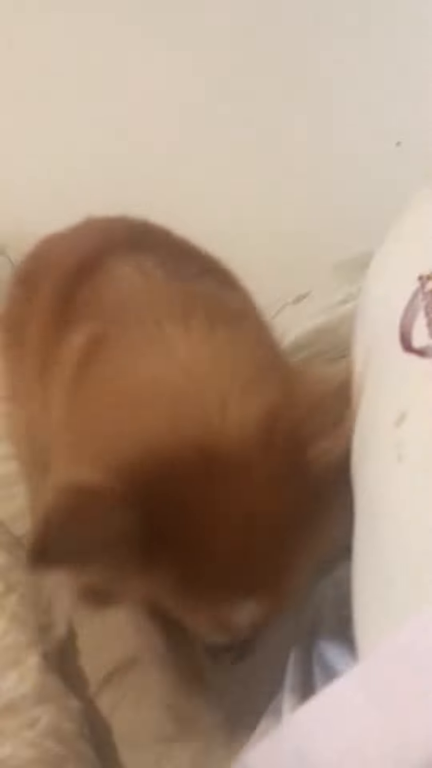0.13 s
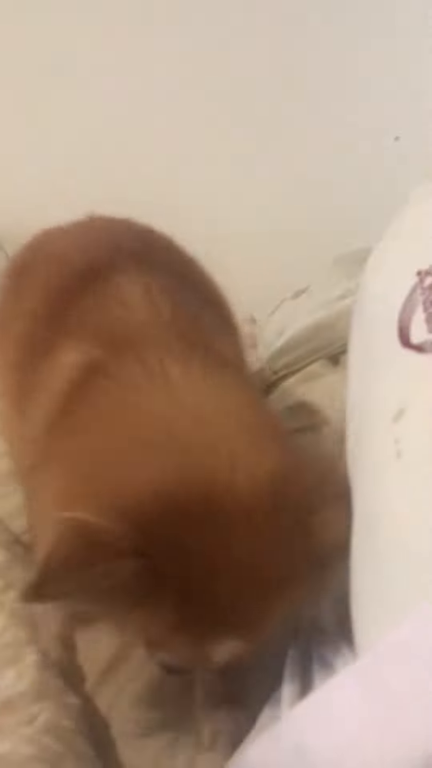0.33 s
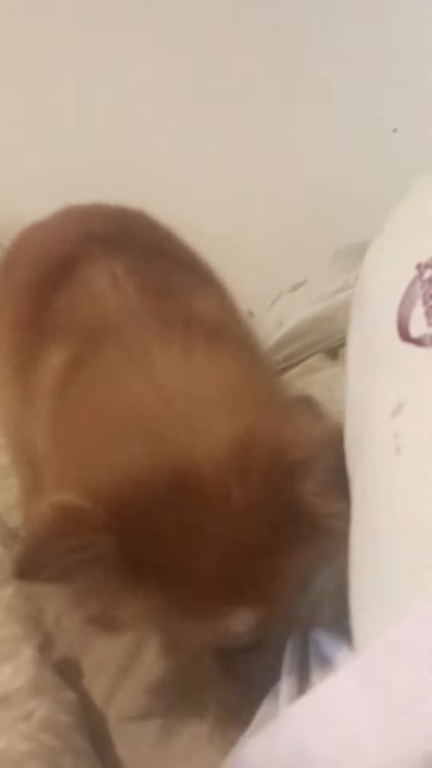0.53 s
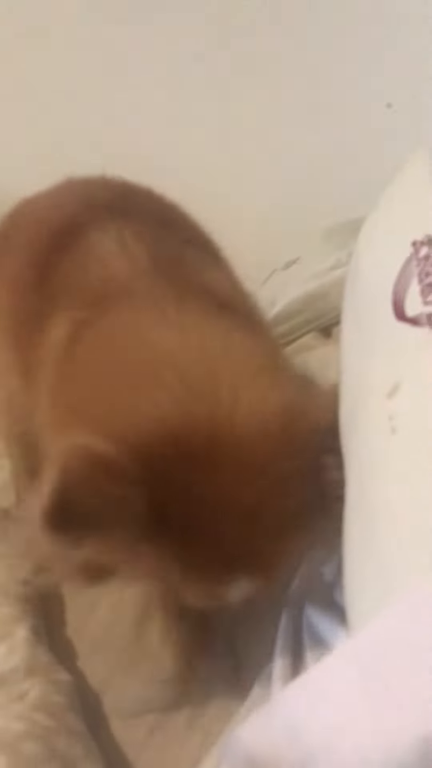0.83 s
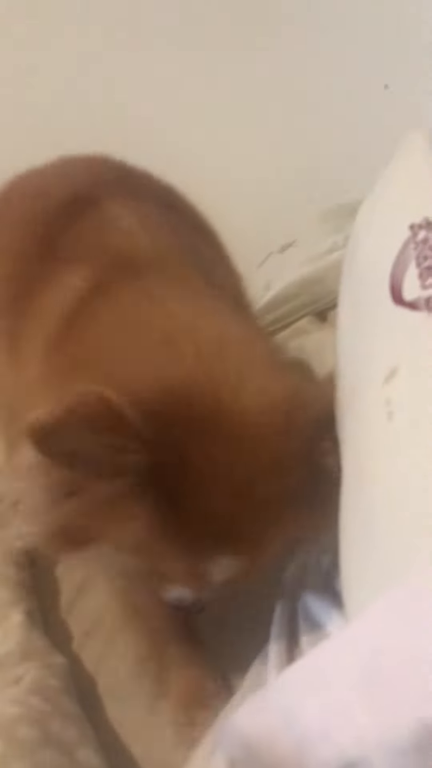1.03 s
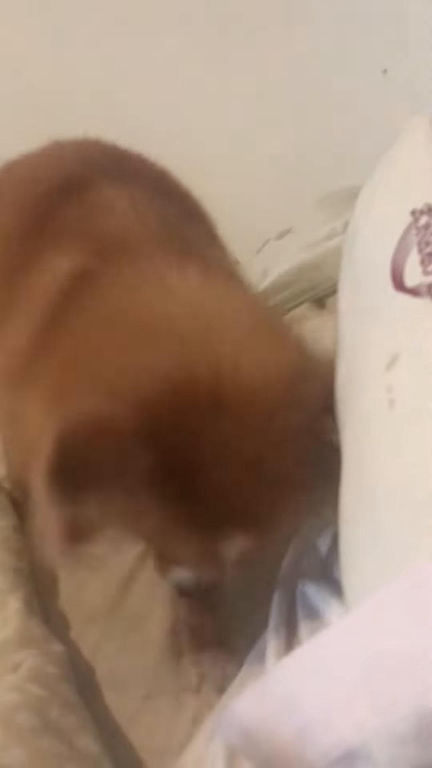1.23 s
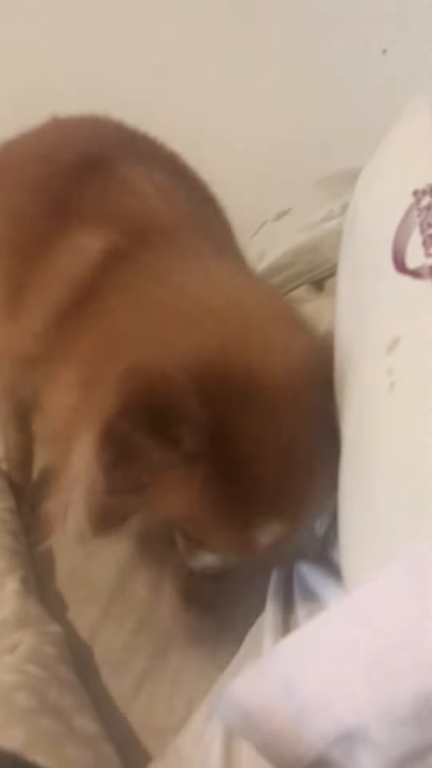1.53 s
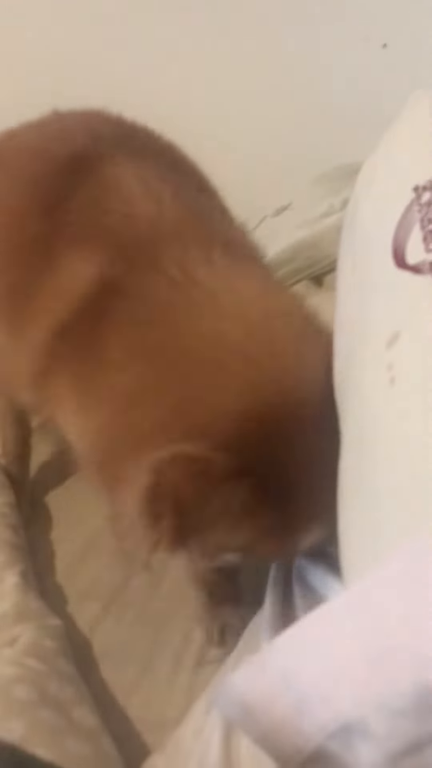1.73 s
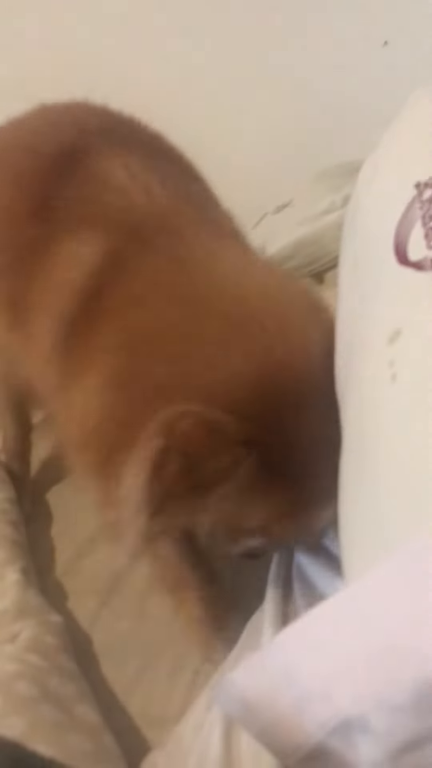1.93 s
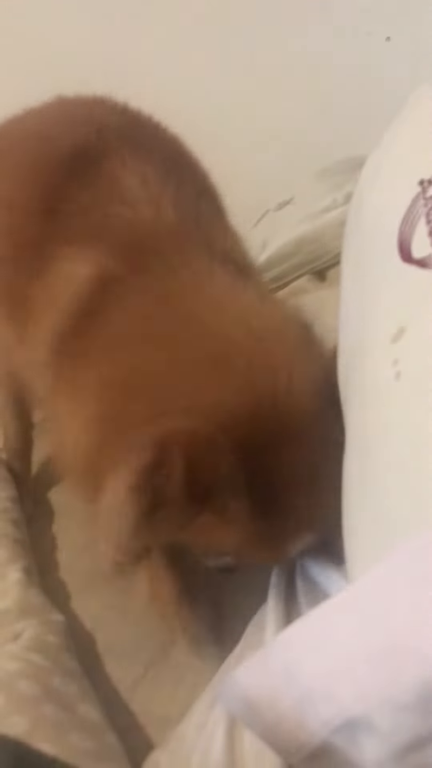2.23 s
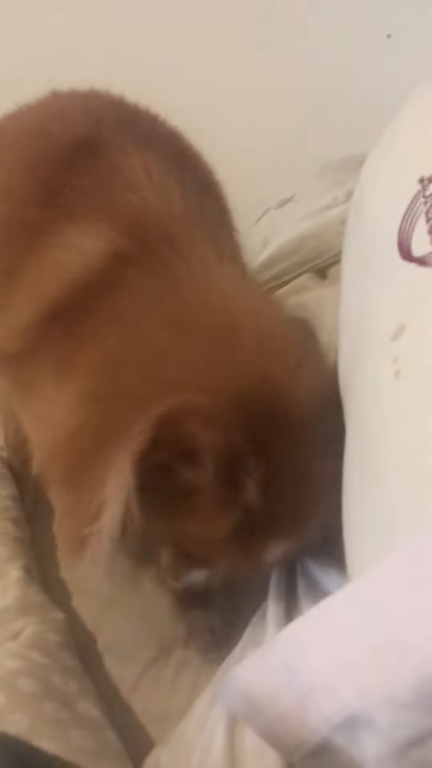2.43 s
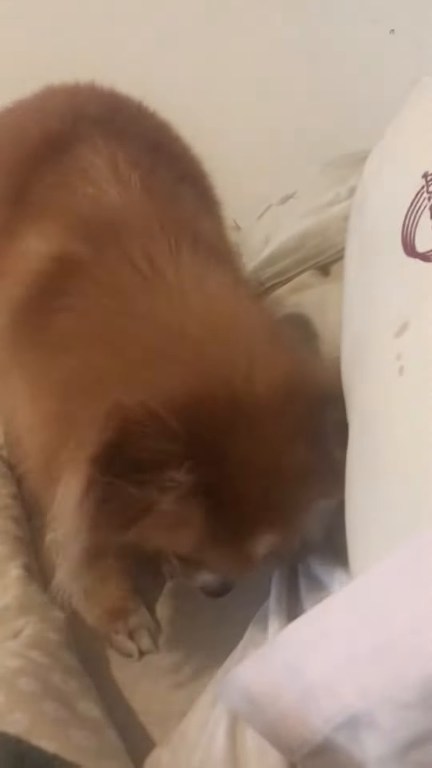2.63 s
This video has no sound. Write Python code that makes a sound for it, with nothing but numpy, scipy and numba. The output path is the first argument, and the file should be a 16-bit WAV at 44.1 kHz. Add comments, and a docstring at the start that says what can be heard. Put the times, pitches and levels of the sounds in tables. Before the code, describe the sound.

A small dog scratches bedding in quick, regular strokes, claws zipping over the weave, paws thudding dully on the mattress, with short snorts between strokes; close phone microphone in a quiet, slightly live bedroom.

```python
"""Quiet bedroom: a small dog digs at the bedding with quick strokes of both front paws, close to a phone.
Pads rub the sheet as moving noise bands; claws zip over the weave as glides whose pitch mostly climbs.
Cloth snaps free in fast upward chirps. The mattress thuds (decaying sines) and rumbles (resonant noise).
The dog snorts between strokes: noise in nose resonances. Short room tail, faint room noise.
"""
import sys
import numpy as np
from scipy import signal
from scipy.fft import rfft, irfft
from scipy.io import wavfile
from scipy.ndimage import uniform_filter1d
from numba import njit

SR = 44100
rng = np.random.default_rng(int(sys.argv[2]) if len(sys.argv) > 2 else 0)


def unload_wav(signal):
    """Save mono or channel-first audio to the path in sys.argv[1] as 16-bit WAV at rate SR, clipped to [-1, 1]."""
    wavfile.write(
        sys.argv[1],
        SR,
        np.round(np.clip(np.atleast_2d(signal).T, -1, 1) * 32767).astype(np.int16),
    )


N = 123479

# background noise spectrum, relative: f/Hz, level/dB
ROOM_SPECTRUM = [(25, -10), (55, -4), (75, -8), (165, -21), (253, -19.5), (471, -32.5), (524, -28.5),
                 (1000, -31), (15600, -50)]
# bed resonances: f/Hz, width per filter pass/Hz, level re rumble/dB
BED_MODES = [(52.7, 12.4, -10), (71.1, 15, -9), (94.3, 25, -10), (151, 38, -5.5), (190.8, 51, -7.5),
             (266, 200, -10.5)]
# bed rumble envelope: t/s, deep level/dB, upper level/dB
RUMBLE_LEVELS = [(0.0, -66, -64), (0.13, -69, -65.5), (0.36, -49, -55), (0.54, -52.5, -56),
                 (0.64, -47, -48.5), (0.74, -48, -49.5), (0.98, -51.5, -55), (1.03, -43, -46),
                 (1.18, -48.5, -55), (1.32, -46.5, -52.5), (1.37, -62, -54), (1.649, -41, -49),
                 (1.71, -58, -56.5), (1.81, -45.5, -58), (1.85, -39.5, -45), (1.92, -47, -53.5),
                 (2.11, -50, -64.5), (2.15, -48.5, -44.5), (2.37, -48, -55.5), (2.44, -69, -70.5),
                 (2.491, -41, -44), (2.59, -60, -91), (2.8, -82, -77)]
# pad rubs, one list per paw stroke: t/s, rub level/dB, rub centre f/Hz,
# low rustle re rub level/dB, treble hiss re rub level/dB
PAW_STROKES = [
    [(0.212, -72.5, 1060, 12.5, -5), (0.258, -74, 1330, 13.5, -17), (0.288, -47, 1350, -0.5, -30),
     (0.316, -47.5, 1410, -23, -17), (0.36, -57, 2600, -1, -2)],
    [(0.36, -50, 1400, -9.5, -19), (0.38, -45.5, 1350, -4.5, -44), (0.416, -48.5, 2330, -12.5, -15),
     (0.452, -55, 2660, -3.5, -6.5), (0.5, -62, 1330, 4, -5), (0.52, -71, 1150, -6, -16)],
    [(0.52, -74, 1390, -10, -1), (0.534, -62, 1530, 10, -26), (0.586, -45.5, 2070, -5, -21),
     (0.622, -50.5, 1870, -12, -18), (0.648, -53, 1490, -2.5, -4), (0.69, -73, 1230, 2, -8)],
    [(0.69, -73, 2010, 11, -11), (0.706, -67, 2470, 10.5, -13), (0.734, -47, 3560, -12.5, -19),
     (0.752, -48.5, 4500, -3, -8), (0.776, -60, 4540, 0.5, 1), (0.81, -63.5, 1780, 9, -6)],
    [(0.81, -70.5, 1780, 6, -24), (0.832, -47.5, 1590, -3, -24), (0.884, -46, 4480, -12, -12),
     (0.904, -42.5, 4500, -11.5, -16), (0.926, -60, 2350, 3.5, 3), (0.95, -55, 1480, 3, -21)],
    [(0.968, -65, 1690, 14, -9), (0.992, -45, 2560, -8.5, -25), (1.022, -47.5, 4800, -17, -6),
     (1.048, -56, 4660, 3, -2.5), (1.07, -64, 3820, -19, -3)],
    [(1.07, -72.5, 1570, 14, -14), (1.108, -46.5, 1720, -6.5, -31), (1.128, -48, 1990, -8, -12),
     (1.162, -45, 4350, -11.5, -10.5), (1.236, -45.5, 3340, -8, -15), (1.25, -48.5, 3490, -1, -20)],
    [(1.25, -59, 2730, -16, -27), (1.274, -41.5, 3000, -14, -22), (1.294, -49, 3700, -12, -4.5),
     (1.318, -50.5, 3900, -5.5, -12), (1.342, -57, 3000, -10, -5.5), (1.365, -70, 2160, -10, -7)],
    [(1.365, -69, 1630, 8, -10), (1.403, -48, 1770, -3, -18), (1.419, -52, 1950, -10, -15),
     (1.457, -45.5, 4550, -11.5, -12), (1.481, -51.5, 3260, -3.5, -8), (1.5, -55, 2090, -11, -14)],
    [(1.5, -59.5, 3040, 7, -17), (1.54, -46.5, 2820, -5.5, -19), (1.588, -44.5, 3800, -15, -15),
     (1.608, -53, 3580, -4.5, -10), (1.634, -59, 2140, -7, -9), (1.655, -65, 1360, -3, -17)],
    [(1.655, -70, 1900, 6, -20), (1.669, -61.5, 1830, 9.5, -26), (1.693, -48.5, 1720, -8, -18),
     (1.739, -45, 4900, -10, -13), (1.777, -60, 5200, -1.5, -0.5), (1.8, -76, 2200, 10, -26)],
    [(1.8, -63, 2170, -9, -19), (1.826, -52, 3110, -0.5, -32), (1.848, -41.5, 3900, -12, -6),
     (1.882, -49, 3180, -9, -14), (1.922, -52, 3080, -6.5, -5), (1.945, -68, 3180, -31, -19)],
    [(1.945, -47, 2260, -9.5, -20), (1.967, -45.5, 1770, -9, -18), (1.991, -48, 2040, -18, -5.5),
     (2.023, -49, 3520, -9, -10.5), (2.061, -53.5, 2970, -8.5, -16), (2.1, -77, 2150, -8, -12)],
    [(2.11, -70.5, 2660, 6, -8), (2.134, -51, 3500, -4.5, -10), (2.148, -46.5, 3940, -5, -4),
     (2.158, -46.5, 4300, -17, -9), (2.18, -52, 3780, -1, -3), (2.225, -66.5, 1410, 3, -12)],
    [(2.225, -60.5, 1440, -2, -27), (2.267, -44, 1380, -16.5, -15.5), (2.303, -54, 3450, 1.5, -3),
     (2.323, -44, 4000, -19, -25), (2.353, -59.5, 4200, -2, -14), (2.4, -74, 1560, -12, -13)],
    [(2.438, -74.5, 1490, 12.5, 2), (2.472, -48, 1990, -11, -17), (2.496, -54, 1930, -11, -9.5),
     (2.564, -71.5, 1280, 5.5, -23), (2.6, -73, 1420, -9, -10)],
]
# paw thuds on the mattress: t/s, level before attack and decay/dB, f/Hz, ring/cycles
PAW_THUDS = [(0.209, -48, 53.4, 2.8), (0.333, -30, 123, 2.2), (0.414, -35, 78.6, 4.1),
             (0.642, -36.5, 163.5, 5.7), (0.733, -43, 132, 1.9), (0.7533, -22.5, 140, 2.5),
             (0.791, -42, 99.6, 1.5), (0.895, -36.5, 71.5, 2.4), (1.015, -27.5, 99, 2.04),
             (1.08, -29.5, 60.4, 1.66), (1.223, -36, 52.3, 1.7), (1.283, -37.5, 113, 6.1),
             (1.301, -32.5, 76.4, 3), (1.44, -38, 164, 3.4), (1.534, -37, 67.4, 3.3),
             (1.572, -27.5, 110, 2.1), (1.651, -34, 60.5, 1.5), (1.787, -34.5, 61.3, 2),
             (1.837, -25, 151, 1.85), (1.85, -27, 175, 3.4), (1.922, -42.5, 71, 11), (2.01, -42.5, 72, 12),
             (2.076, -39.5, 70.3, 7), (2.146, -33, 71.6, 5.9), (2.194, -33, 157, 3.1),
             (2.251, -36.5, 78, 7.6), (2.308, -27, 86.4, 1.4), (2.348, -41.5, 61.6, 4.9),
             (2.483, -38, 81.6, 3.2)]
# claw drags across the threads: start t/s, end t/s, first f/Hz, last f/Hz, level/dB, roughness/0-1
CLAW_ZIPS = [(.260, .287, 700, 2700, -54, .35), (.280, .303, 1150, 1500, -52, .35),
             (.342, .348, 6400, 6700, -56, .2), (.345, .358, 8600, 9800, -51, .6),
             (.348, .375, 8300, 8250, -58, .25), (.352, .362, 10800, 11200, -58, .4),
             (.397, .409, 1900, 4300, -51, .2), (.405, .424, 2850, 2700, -54, .25),
             (.422, .441, 2400, 2520, -56, .2), (.442, .468, 2600, 4900, -57.5, .45),
             (.555, 0.594, 2300, 6300, -55, 0.75), (.620, 0.649, 3500, 10000, -57.5, 1),
             (.712, .725, 1800, 3700, -52, .5), (.714, .737, 1100, 3250, -47, .22),
             (.730, .746, 2500, 4900, -43, .18), (.742, .7485, 5000, 6200, -44, .2),
             (.744, .750, 4500, 4300, -46, .2), (.751, .767, 4480, 4620, -53, .4),
             (.766, .800, 4350, 4200, -58, .45), (.820, 0.833, 1800, 3170, -52, 0.6),
             (.835, 0.857, 900, 2080, -52, .5), (0.849, 0.888, 5200, 6100, -54.5, .4),
             (.896, 0.925, 6200, 10600, -50, .2), (.988, 1.03, 2300, 6900, -53, 0.54),
             (1.029, 1.055, 5200, 5630, -59, 0.4), (1.078, 1.116, 1300, 4100, -57, .45),
             (1.094, 1.126, 600, 2800, -54, .55), (1.125, 1.165, 1500, 2400, -56, .55),
             (1.118, 1.152, 3800, 7500, -56, .6), (1.167, 1.201, 4900, 6200, -52, .3),
             (1.256, 1.290, 800, 7400, -52, .35), (1.282, 1.309, 4000, 4700, -55, .5),
             (1.388, 1.405, 2200, 4470, -53, 0.65), (1.395, 1.419, 1400, 1870, -51, .2),
             (1.405, 1.448, 4000, 4300, -55, 0.58), (1.438, 1.462, 4100, 7200, -54, .4),
             (1.454, 1.488, 4900, 9200, -53, .2), (1.555, 1.58, 2500, 5510, -54, .6),
             (1.664, 1.668, 2300, 2380, -50, 0), (1.679, 1.696, 1500, 2900, -53, .35),
             (1.691, 1.712, 1400, 1950, -55, .4), (1.696, 1.722, 4100, 5000, -54, .4),
             (1.738, 1.750, 5800, 5820, -48, .15), (1.748, 1.766, 6000, 7400, -52, .3),
             (1.955, 2.003, 1300, 2010, -57.5, .5), (1.980, 2.006, 4200, 5660, -58, 0.74),
             (2.015, 2.044, 4700, 3780, -53.5, 0.42), (2.041, 2.043, 2300, 2350, -46.5, 0),
             (2.122, 2.152, 2500, 6200, -52, 0.73), (2.16, 2.208, 4500, 6600, -60.5, 0.93),
             (2.26, 2.311, 2800, 6800, -53.5, 0.97), (2.310, 2.33, 5600, 4930, -53, 0.66)]
# cloth slipping off a claw: start t/s, end t/s, first f/Hz, last f/Hz, peak level/dB
CLOTH_SNAPS = [(.7040, .7065, 890, 2500, -56), (.7475, .7522, 4300, 15000, -37),
               (.9428, .9442, 11500, 15700, -52), (1.5000, 1.5015, 12500, 15700, -55),
               (0.939, 0.9423, 1480, 2780, -46.5), (1.0235, 1.0258, 700, 2240, -42.5),
               (1.8487, 1.8528, 5200, 15500, -35), (2.1452, 2.1476, 9200, 12500, -36),
               (2.3690, 2.3710, 800, 3000, -55), (2.483, 2.4900, 500, 1470, -50.5)]
# snorts: start t/s, length/s, level/dB, hollow low note re level/dB, top-band gain/dB
DOG_SNORTS = [(1.171, 0.097, -48, -31.5, 1.5), (1.484, 0.098, -49, -6, -0.5), (1.779, 0.052, -66, 7.5, -15),
              (1.862, 0.097, -45.5, -39, 0.5), (2.51, 0.065, -67, 8, -14)]
# nose resonances: f/Hz, width per filter pass/Hz, relative level/dB
NOSE_BANDS = [(2405, 150, 2), (2720, 260, -2), (3200, 320, -2), (3840, 580, 2.5), (4550, 390, -7),
              (5470, 950, 1), (6500, 1900, -5.5), (8000, 1900, 1), (9240, 1100, 0.5)]
# microphone response: f/Hz, gain/dB
MIC_RESPONSE = [(20, -25), (32, 0.5), (50, 1), (4500, 0), (5000, 1), (5600, 1), (9500, -2.5), (10500, -5),
                (11500, 0), (15500, 4)]

ROOM_LEVEL_DB, ROOM_DRIFT_DB = -57.5, 1.5
BED_SPLIT_HZ, BED_FLICKER_DB = 120, 2
RUB_WIDTH_SHARE, RUB_GRAIN_DB, RUB_SKIRT_DB, RUB_EDGE_S = 1, 2, -4, 0.015  # width as share of centre
TAIL_T60_S, TAIL_DELAY_S, TAIL_DB = 0.24, 0.004, -20
THUD_ATTACK_S = 0.0027  # time constant
ZIP_WIDTH_SHARE, ZIP_WOBBLE_SHARE, ZIP_FLUTTER_DB = 0.3, 0.04, 5
ZIP_RISE_SHARE, ZIP_FALL_SHARE = 0.35, 0.2  # of the zip length
SNAP_BEND = 2.5  # exponent: pitch hangs, then shoots up
SNORT_ATTACK_S, SNORT_RELEASE_S, SNORT_FLUTTER_DB = 0.022, 0.024, 0.5
NOSE_TOP_HZ, HOLLOW_HZ, HOLLOW_WIDTH_HZ = 7400, 740, 110
MIC_TOP_HZ = 15757


def undb(db):
    """Decibels to amplitude."""
    return 10 ** (np.asarray(db) / 20)


def unit(x):
    """Scale to RMS 1."""
    return x / np.sqrt(np.mean(x ** 2) + 1e-30)


@njit
def svf(x, hz, width_hz):
    """State-variable band-pass; centre and width may move every sample."""
    y, band_state, low_state = np.empty(len(x)), 0., 0.
    for i in range(len(x)):
        g = np.tan(np.pi * hz[i] / SR)
        k = width_hz[i] / hz[i]
        v = (band_state + g * (x[i] - low_state)) / (1 + g * (g + k))
        band_state = 2 * v - band_state
        low_state += 2 * g * v
        y[i] = k * v
    return y


def band(x, hz, width_hz):
    """Steeper band-pass: two passes."""
    hz, width_hz = hz + 0 * x, width_hz + 0 * x
    return svf(svf(x, hz, width_hz), hz, width_hz)


def walk(n, rate_hz):
    """Random levels, new target every 1 / rate_hz seconds, ramped between; spread near 1."""
    hold = max(int(SR / rate_hz), 1)
    steps = np.repeat(rng.standard_normal(n // hold + 1), hold)
    return 1.42 * uniform_filter1d(steps, hold)[:n]


def colour(x, points):
    """Shape a spectrum by (f/Hz, level/dB) points, interpolated on log frequency."""
    p = np.array(points)
    hz = np.arange(len(x) // 2 + 1) * SR / len(x)
    gain_db = np.interp(np.log(hz + 1), np.log(p[:, 0]), p[:, 1])
    return irfft(rfft(x) * undb(gain_db), len(x))


def add(out, x, start_s):
    """Mix x into out at start_s."""
    i = int(start_s * SR)
    out[i:i + len(x)] += x[:len(out) - i]


def fade(n, attack_s, release_s):
    """Sine-squared rise and fall."""
    t = np.arange(n) / SR
    ramp = np.minimum(t / attack_s, t[::-1] / release_s)
    return np.sin(np.pi / 2 * np.clip(ramp, 0, 1)) ** 2


def room_noise():
    """Quiet room: coloured noise with slow level drift."""
    noise = unit(colour(rng.standard_normal(N), ROOM_SPECTRUM))
    return noise * undb(ROOM_LEVEL_DB + ROOM_DRIFT_DB * walk(N, 6))


def bed_rumble():
    """Restless noise in the bed's resonances; deep and upper modes follow separate envelopes."""
    t, levels, out = np.arange(N) / SR, np.array(RUMBLE_LEVELS), np.zeros(N)
    for hz, width_hz, mode_db in BED_MODES:
        column = 1 if hz < BED_SPLIT_HZ else 2
        level_db = np.interp(t, levels[:, 0], levels[:, column])
        flicker_db = BED_FLICKER_DB * walk(N, 25.18)
        mode = unit(band(rng.standard_normal(N), hz, width_hz))
        out += undb(level_db + mode_db + flicker_db) * mode
    return out


def grit(share=1):
    """Grainy friction: noise with fast random level changes."""
    return rng.standard_normal(N) * undb(share * RUB_GRAIN_DB * walk(N, 400))


def strokes():
    """Fibre friction: a broad band that rides with paw speed, plus low rustle and treble hiss."""
    core_grit, skirt_grit, out = grit(), grit(), np.zeros(N)
    rustle = unit(band(grit(), 656.0, 1560.0))
    hiss = unit(band(grit(share=0.62), 9900.0, 11000.0))
    for rows in PAW_STROKES:
        r = np.array(rows)
        i, j = int((r[0, 0] - RUB_EDGE_S) * SR), int((r[-1, 0] + RUB_EDGE_S) * SR)
        t = np.arange(i, j) / SR
        level_db, hz, rustle_db, hiss_db = (np.interp(t, r[:, 0], r[:, k]) for k in (1, 2, 3, 4))
        # divide by sqrt(width): level holds as the band moves
        width_hz = RUB_WIDTH_SHARE * hz
        core = band(core_grit[i:j], hz, width_hz) / np.sqrt(width_hz / SR)
        skirt = svf(skirt_grit[i:j], 0.94 * hz, 1.35 * hz) / np.sqrt(1.12 * hz / SR)
        rub = 0.36 * (core + undb(RUB_SKIRT_DB) * skirt)
        rub += undb(rustle_db) * rustle[i:j] + undb(hiss_db) * hiss[i:j]
        out[i:j] += rub * undb(level_db) * np.sqrt(fade(j - i, 2 * RUB_EDGE_S, 2 * RUB_EDGE_S))
    return out


def room_tail(near):
    """Diffuse reflections: convolution with delayed, exponentially decaying noise."""
    t = np.arange(SR // 4) / SR
    decay = np.exp(-np.log(1000) * t / TAIL_T60_S)
    tail = rng.standard_normal(len(t)) * decay * (t > TAIL_DELAY_S)
    wet = signal.fftconvolve(near, tail / np.sqrt(np.sum(tail ** 2)))[:N]
    return undb(TAIL_DB) * wet


def thuds():
    """Paw hits on the mattress: soft-onset damped sines."""
    t, out = np.arange(SR // 5) / SR, np.zeros(N)
    for start_s, level_db, hz, cycles in PAW_THUDS:
        attack = 1 - np.exp(-t / THUD_ATTACK_S)
        decay = np.exp(-t * hz * np.pi / cycles)
        add(out, undb(level_db) * attack * decay * np.sin(2 * np.pi * hz * t), start_s)
    return out


def zips():
    """Threads passing a claw fuse into a whistle; a rough drag wavers and dissolves into band noise."""
    out = np.zeros(N)
    wobble, flutter, noise = walk(N, 300), walk(N, 500), rng.standard_normal(N)
    for start_s, end_s, first_hz, last_hz, level_db, rough in CLAW_ZIPS:
        length_s = end_s - start_s
        hz = np.geomspace(first_hz, last_hz, int(length_s * SR))
        rough = np.clip(rough, 0, 1)
        i = int(start_s * SR)
        s = slice(i, i + len(hz))
        tone_hz = hz * (1 + ZIP_WOBBLE_SHARE * rough * wobble[s])
        tone = np.sqrt(2) * np.sin(2 * np.pi * np.cumsum(tone_hz) / SR)
        tone *= undb(ZIP_FLUTTER_DB * np.sqrt(rough) * flutter[s])
        width_hz = ZIP_WIDTH_SHARE * (0.69 + rough ** 2) * hz + 300
        scrape = unit(band(noise[s], hz, width_hz))
        drag = np.sqrt(1 - rough) * tone + np.sqrt(rough) * scrape
        envelope = fade(len(hz), ZIP_RISE_SHARE * length_s, ZIP_FALL_SHARE * length_s)
        add(out, undb(level_db) * drag * envelope, start_s)
    return out


def snaps():
    """Cloth slips off a claw: whip-like tick, a sine chirp of a few ms."""
    out = np.zeros(N)
    for start_s, end_s, first_hz, last_hz, level_db in CLOTH_SNAPS:
        length_s = end_s - start_s
        bend = np.linspace(0, 1, int(length_s * SR)) ** SNAP_BEND
        hz = first_hz + (last_hz - first_hz) * bend
        chirp = np.sin(2 * np.pi * np.cumsum(hz) / SR)
        add(out, undb(level_db) * chirp * fade(len(hz), length_s / 3, length_s / 8), start_s)
    return out


def snorts():
    """Unsteady air through the nostrils: noise in fixed nose resonances plus a hollow low note."""
    air = rng.standard_normal(N) * undb(SNORT_FLUTTER_DB * walk(N, 90))
    lower, top, out = np.zeros(N), np.zeros(N), np.zeros(N)
    for k, (hz, width_hz, band_db) in enumerate(NOSE_BANDS):
        # neighbours alternate in polarity
        resonance = (-1) ** k * undb(band_db) * band(air, hz, width_hz) / np.sqrt(width_hz)
        if hz > NOSE_TOP_HZ:
            top += resonance
        else:
            lower += resonance
    size = np.std(lower + top)
    hollow = unit(band(air, HOLLOW_HZ, HOLLOW_WIDTH_HZ))
    for start_s, length_s, level_db, hollow_db, top_db in DOG_SNORTS:
        i, n = int(start_s * SR), int(length_s * SR)
        puff = (lower + undb(top_db) * top) / size + undb(hollow_db) * hollow
        add(out, undb(level_db) * puff[i:i + n] * fade(n, SNORT_ATTACK_S, SNORT_RELEASE_S), start_s)
    return out


def scene():
    """Sum all sources; the tail takes no mattress sound."""
    near = strokes() + zips() + snaps() + snorts()
    mattress = bed_rumble() + thuds()
    return (near + room_tail(near) + mattress + room_noise())[None]


def record(dry):
    """Phone microphone: uneven response with small notches, then a steep low-pass."""
    heard = colour(dry[0], MIC_RESPONSE)
    top_cut = signal.ellip(12, 0.2, 80, MIC_TOP_HZ, fs=SR, output="sos")
    return signal.sosfilt(top_cut, heard)[None]


dry = scene()
out = record(dry)
unload_wav(out)
```